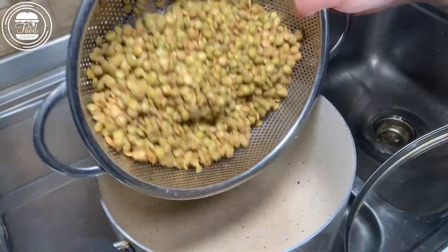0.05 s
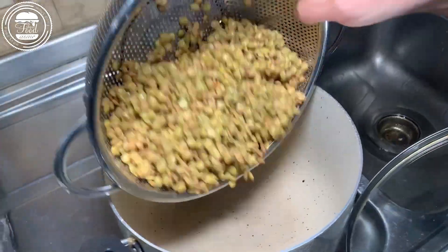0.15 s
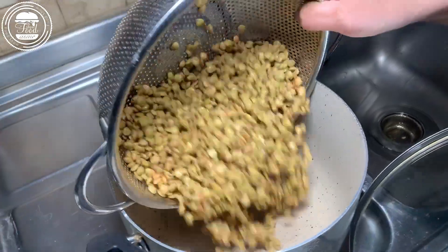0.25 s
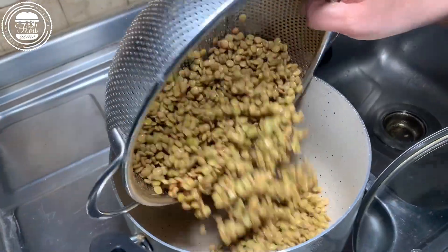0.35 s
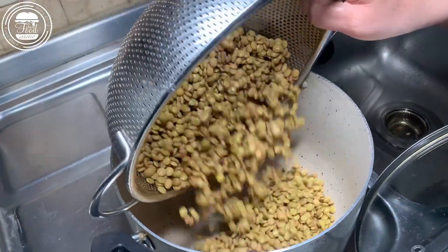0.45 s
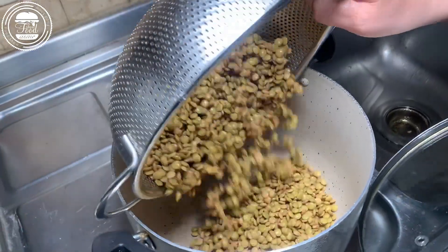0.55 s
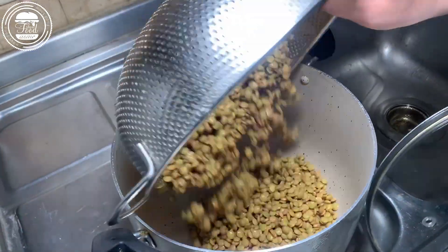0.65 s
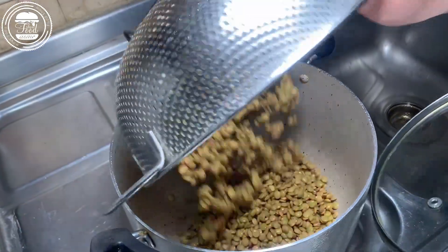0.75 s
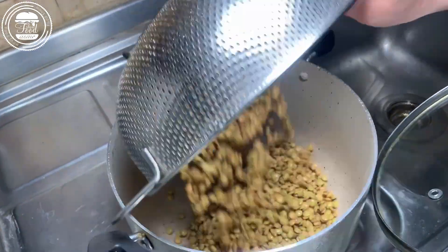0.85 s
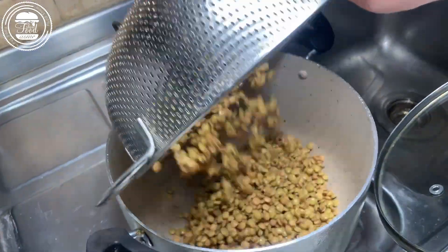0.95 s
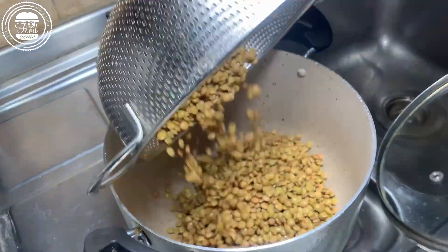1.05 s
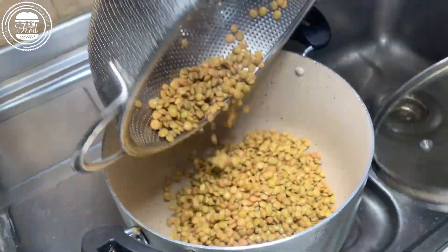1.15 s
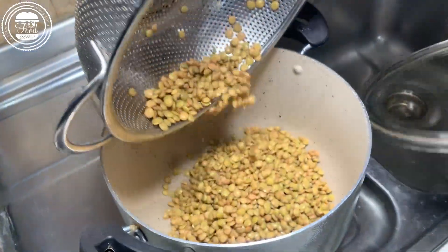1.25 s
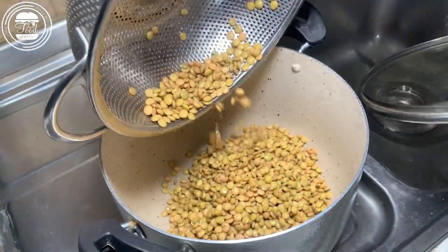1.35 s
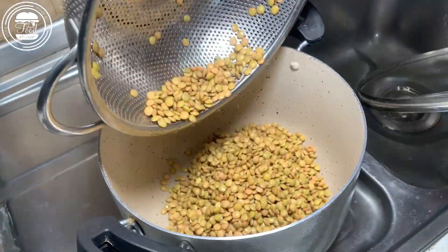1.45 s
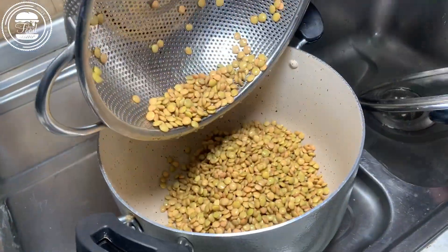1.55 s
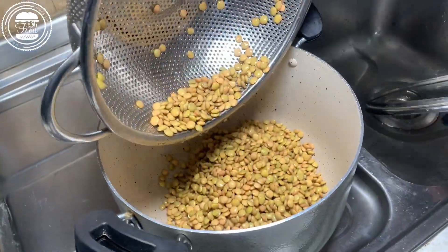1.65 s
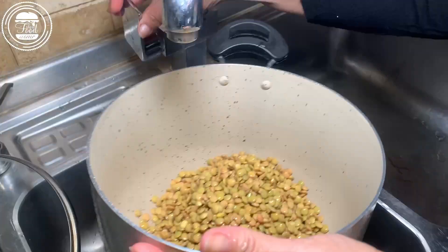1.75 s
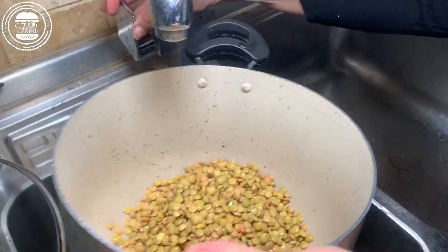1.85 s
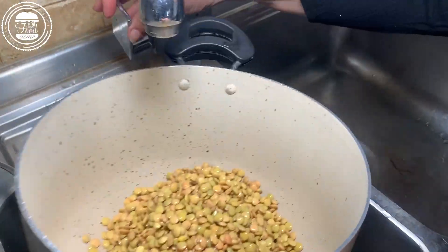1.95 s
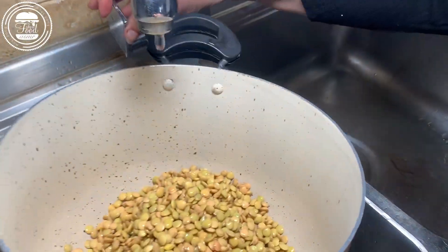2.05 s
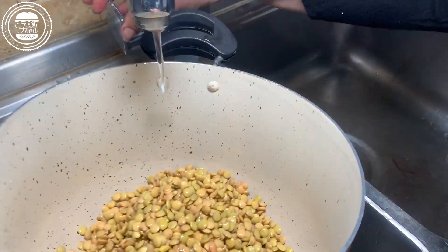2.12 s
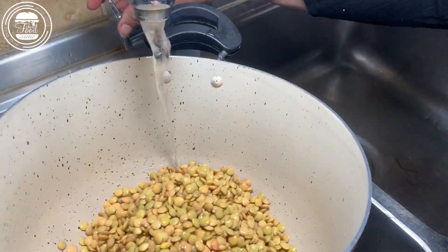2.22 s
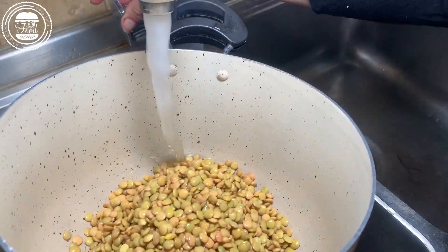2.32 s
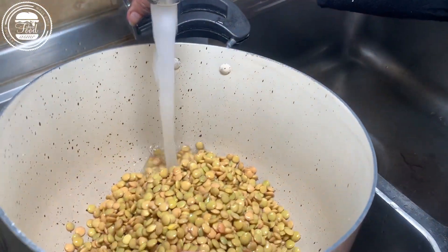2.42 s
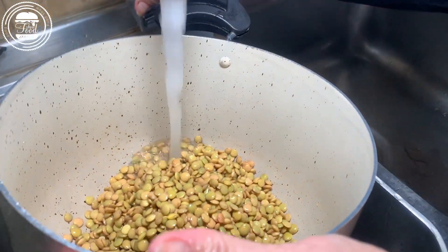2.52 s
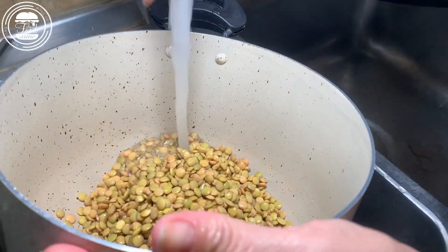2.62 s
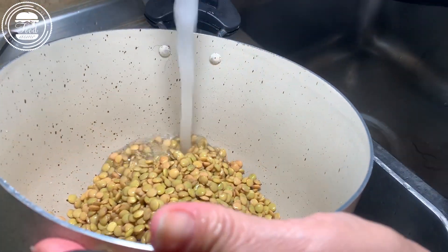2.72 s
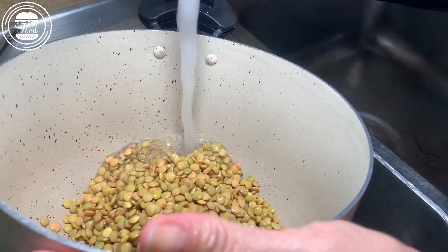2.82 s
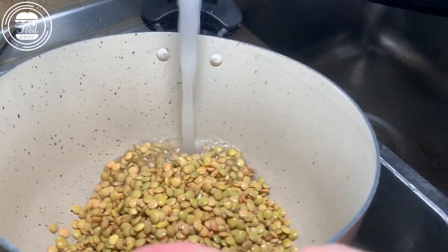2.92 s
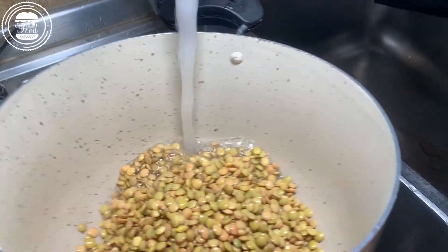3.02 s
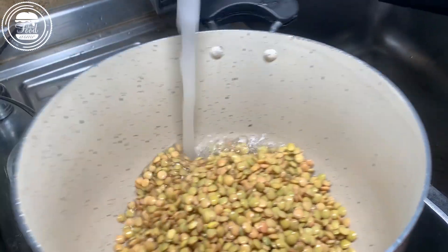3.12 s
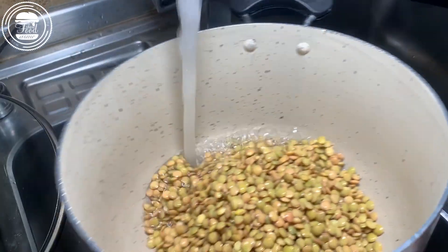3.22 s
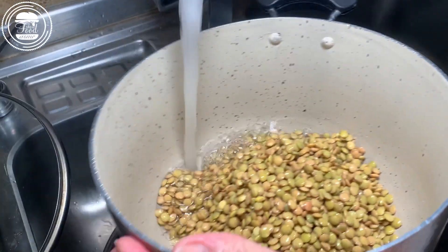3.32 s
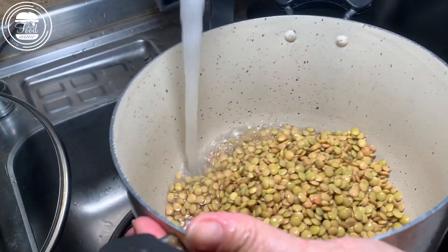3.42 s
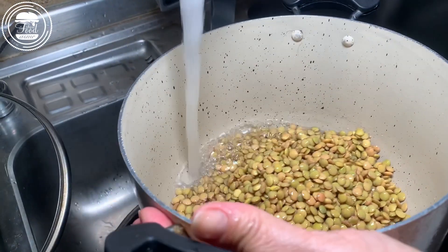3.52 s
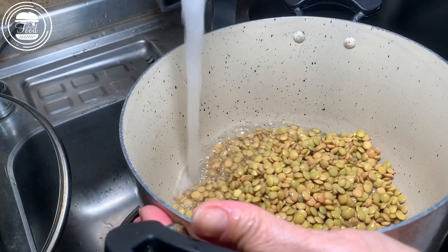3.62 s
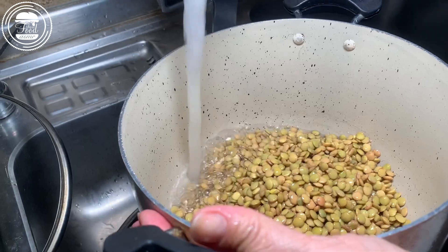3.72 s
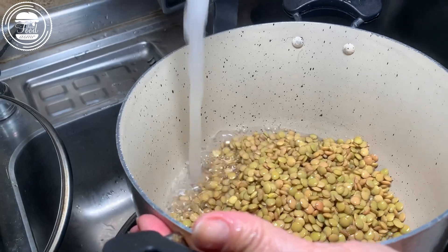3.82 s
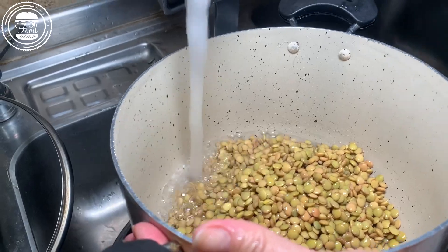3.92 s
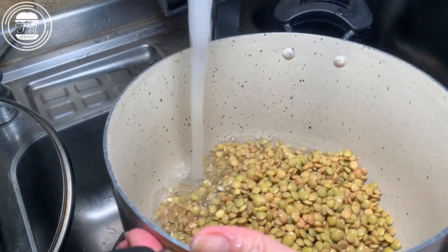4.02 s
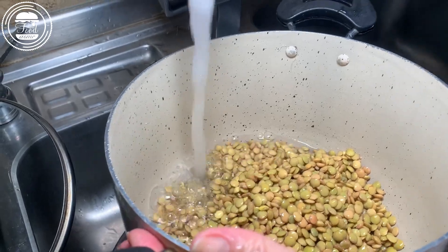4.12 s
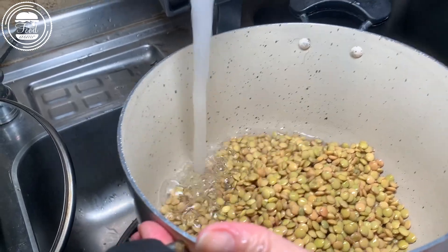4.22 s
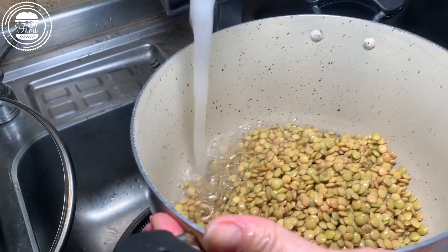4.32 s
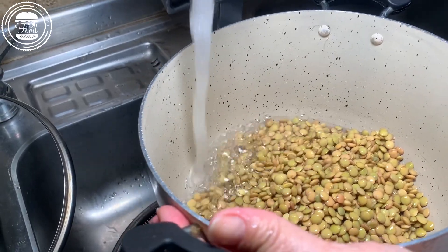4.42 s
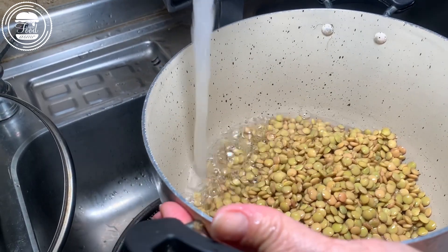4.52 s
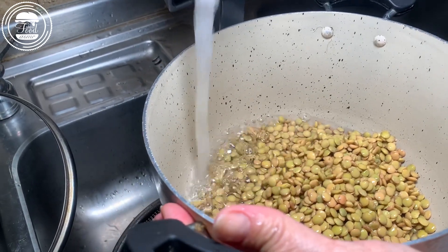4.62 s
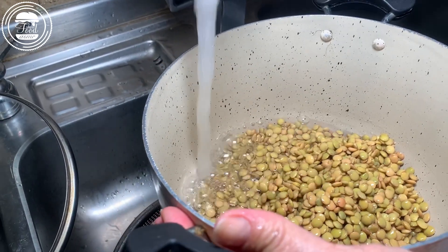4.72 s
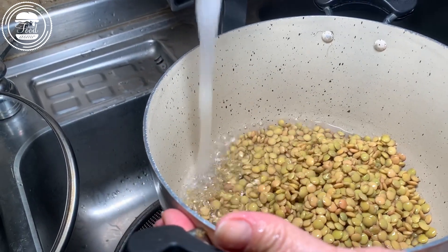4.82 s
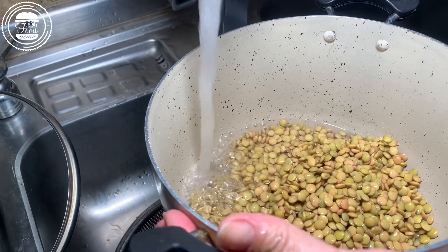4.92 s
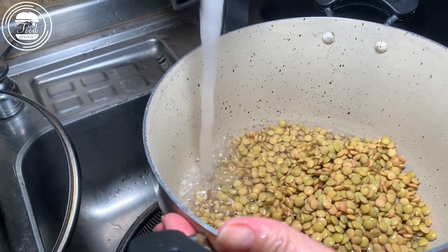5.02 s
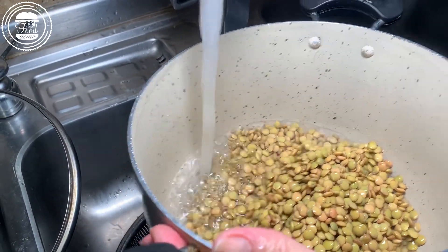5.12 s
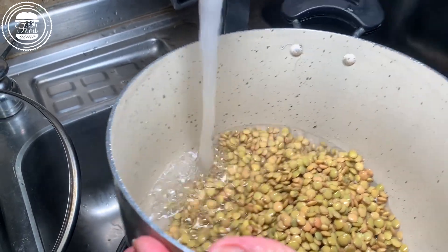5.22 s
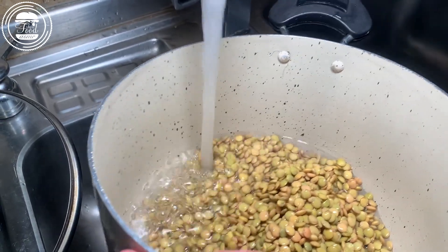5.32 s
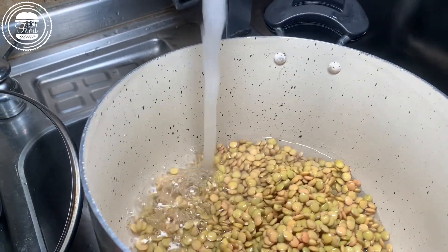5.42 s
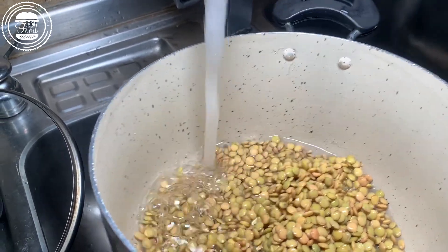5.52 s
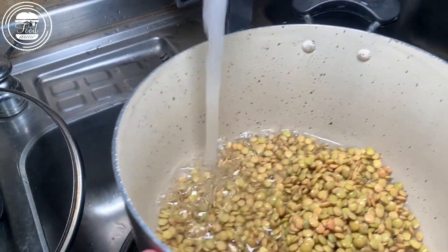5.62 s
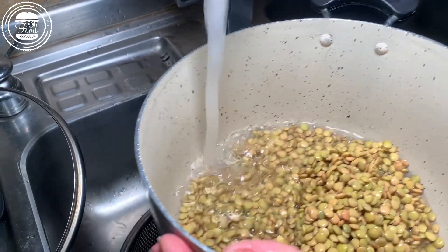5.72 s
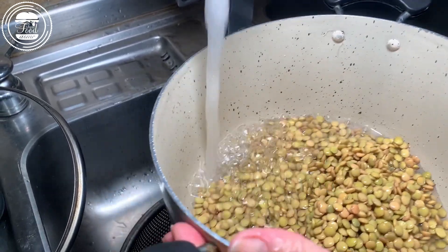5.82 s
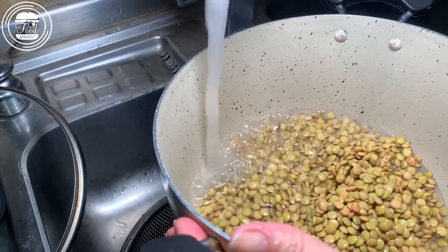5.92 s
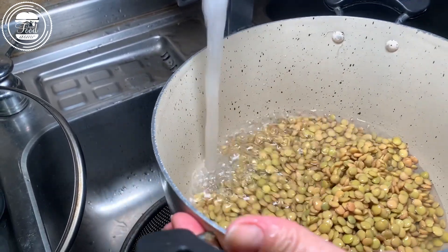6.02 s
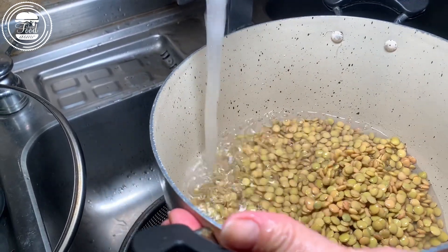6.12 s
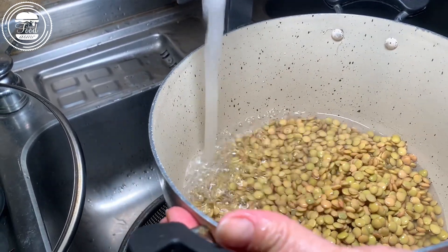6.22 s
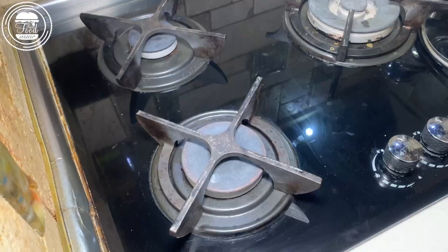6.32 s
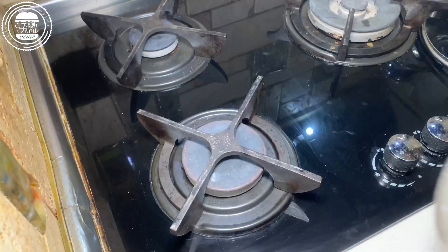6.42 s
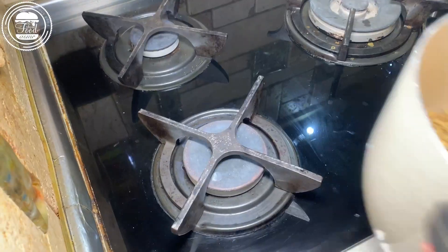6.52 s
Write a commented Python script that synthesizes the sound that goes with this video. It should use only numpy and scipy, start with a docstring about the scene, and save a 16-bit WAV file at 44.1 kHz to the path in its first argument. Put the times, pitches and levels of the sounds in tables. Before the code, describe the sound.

Wet lentils slide from a steel colander and rattle into a pot with two metallic knocks, then a tap hisses open and water spatters.

```python
"""Over a low, slow air rumble, wet lentils slide in a steel colander, which knocks twice on a cooking pot.
The lentils patter and drum into the pot: filtered noise impacts, short rings and decaying steel modes.
A tap opens with hiss and a thin whistle: moving noise bands and a phase-wobbled sine.
Its aerated jet fizzes, spatters and gurgles on the lentils, built from ring clouds and noise, then stops
abruptly. A small kitchen, heard close, adds a short decaying noise reverberation."""
import sys
import numpy as np
from scipy import signal
from scipy.fft import rfft, irfft, next_fast_len
from scipy.io import wavfile
from scipy.ndimage import map_coordinates

SR = 44100
rng = np.random.default_rng(int(sys.argv[2]) if len(sys.argv) > 2 else 0)


def dump(signal):
    """Clip the signal to [-1, 1] and save it as 16-bit WAV at the path in sys.argv[1]."""
    limited = np.clip(np.atleast_2d(signal).T, -1, 1)
    pcm = np.round(limited * 32767).astype(np.int16)
    wavfile.write(sys.argv[1], SR, pcm)


N = 289296
T = np.arange(N) / SR
T_HALF_S = T[:SR // 2]
TOP_HZ = 15850
# Table levels are relative: layer trims follow, and colour() normalizes each spectrum.


def amp(db):
    """Decibels to gain."""
    return 10 ** (np.asarray(db) / 20)


def unit(x):
    """Scale to rms 1."""
    return x / np.sqrt(np.mean(x ** 2) + 1e-20)


def along(points, hz):
    """Interpolate (frequency [Hz], value) points on a log frequency axis."""
    f, v = np.transpose(points)
    return np.interp(np.log(hz + 1), np.log(f + 1), v)


def ramp(start_s, length_s):
    """Linear gain from 0 to 1."""
    return np.clip((T - start_s) / length_s, 0, 1)


def swells(rows):
    """Power sum of (time [s], level [dB], rise [s], fall [s]) swells; rise and fall each span 20 dB."""
    power = 0
    for s, db, rise_s, fall_s in rows:
        drop_db = 20 * np.maximum((s - T) / rise_s, (T - s) / fall_s)
        power = power + amp(db - drop_db) ** 2
    return np.sqrt(power)


def fade(t60_s, swell_s):
    """Half a second of rise and exponential decay."""
    return amp(-60 * T_HALF_S / t60_s) * (1 - np.exp(-(T_HALF_S / swell_s) ** 2))


def wobble(knots_per_s):
    """Smooth random curve."""
    return map_coordinates(rng.standard_normal(4096), [T * knots_per_s], mode="wrap")


def noise():
    """White noise of rms 1."""
    return rng.standard_normal(N)


def short_noise():
    """Half a second of white noise."""
    return rng.standard_normal(SR // 2)


def tone(hz, climb_per_s=0):
    """Half a second of sine; a positive climb raises the pitch."""
    return np.sin(2 * np.pi * hz * T_HALF_S * (1 + climb_per_s * T_HALF_S))


def lowpass(x, hz):
    """Second-order low-pass."""
    return signal.sosfilt(signal.butter(2, hz, fs=SR, output="sos"), x)


def colour(x, spectrum, resonances=()):
    """Minimum-phase filter that keeps white-noise power: a spectrum lifted by ringing resonances."""
    size = 2 * next_fast_len(N // 2 + 8192)
    hz = np.fft.rfftfreq(size, 1 / SR)
    lift = 1
    for f, width_hz, db in resonances:
        lift = lift + (amp(2 * db) - 1) / (1 + (2 * (hz - f) / width_hz) ** 2)
    gain = unit(amp(along(spectrum, hz)) * np.sqrt(np.abs(lift)))
    cepstrum = irfft(np.log(np.maximum(gain, 1e-6)))
    # fold onto positive time: causal response
    cepstrum[1:size // 2] *= 2
    cepstrum[size // 2 + 1:] = 0
    return irfft(rfft(x, size) * np.exp(rfft(cepstrum)))[:N]


def narrow(hz, width_hz):
    """Noise band of rms 1 whose centre may move."""
    slow = lowpass(noise() + 1j * noise(), width_hz / 2)
    carrier = np.exp(2j * np.pi * np.cumsum(hz + 0 * T) / SR)
    return unit((slow * carrier).real)


def impacts(rate, spread_db):
    """Single-sample blows at random moments, signs and sizes, rate per second, rms 1."""
    hit = rng.random(N) < rate / SR
    size = amp(spread_db * np.clip(noise(), -2, 2))
    return unit(hit * np.sign(noise()) * size)


def add(track, s, sound):
    """Mix a sound into the track at time s."""
    part = track[max(round(s * SR), 0):][:len(sound)]
    part += sound[:len(part)]


def bursts(rows):
    """Decaying noise crack per (time [s], level [dB], t60 [s]) row."""
    out = np.zeros(N)
    for s, db, t60_s in rows:
        add(out, s, amp(db) * fade(t60_s, 1e-4) * short_noise())
    return out


def grains(low_hz, high_hz, cycles, spread_db, rise, count):
    """Cloud of tiny decaying rings, rms 1; with rise > 0 each climbs in pitch like a surfacing bubble."""
    when, pitch, size = rng.random((count, 3)).T[:, :, None]
    k = np.arange(400)
    turns = low_hz * (high_hz / low_hz) ** pitch * k / SR
    age = turns / cycles
    size_db = spread_db * np.minimum(-np.log(1 - size), 4)
    tilt_db = 20 * pitch * np.log10(high_hz / low_hz)
    ring = amp(size_db + tilt_db) * np.exp(-2 * age) * np.sin(2 * np.pi * turns * (1 + rise * age))
    return unit(np.bincount(((when * N).astype(int) + k).ravel(), ring.ravel(), N)[:N])


# slow air spectrum: (frequency [Hz], density [dB])
AIR_SPECTRUM = [(13, 20), (22, 1), (55, 5.5), (80, -7), (110, -8), (300, -48.5)]
# room tone spectrum: (frequency [Hz], density [dB])
ROOM_SPECTRUM = [(120, -19.5), (400, -4.5), (800, -11.5), (1400, -14.5), (4400, -22), (5300, -28),
                 (15800, -38)]


def air_and_room():
    """Slow air on the microphone as fluctuating low noise, plus room tone and a faint low drone."""
    rumble = amp(-45.5 + 1.2 * wobble(26)) * colour(noise(), AIR_SPECTRUM)
    room = amp(-64) * colour(noise(), ROOM_SPECTRUM)
    drone = amp(-71) * narrow(189, width_hz=22)
    return rumble + room + drone


# lentils sliding in the tilted colander: (peak time [s], level [dB], rise [s], fall [s])
SLIDES = [(.135, -45, .18, .11), (.45, -45, .2, .55), (1.12, -49, .7, .28), (1.465, -60, .15, .04)]
# lentils skipping on the steel: (time [s], level [dB])
SKIPS = [(.0705, -44), (1.221, -38), (1.477, -46)]
# sliding spectrum: (frequency [Hz], density [dB])
RUSTLE_SPECTRUM = [(700, -21.5), (1500, -2), (2600, 0.5), (4000, -3), (5000, -10), (6200, -7.5),
                   (7200, -13.5), (9500, -14.5), (12000, -27), (15800, -31)]


def sliding_lentils():
    """Lentils rub and skip over perforated steel: dense impacts, noise and short cracks."""
    sliding = swells(SLIDES) * (impacts(rate=1100, spread_db=4) + .3 * noise())
    skips = bursts([(s, db, 0.025) for s, db in SKIPS])
    return colour(amp(-2.5) * (sliding + skips), RUSTLE_SPECTRUM)


# colander on pot: (time [s], level [dB], swell [s], rattle t60 [s], rattle level [dB],
# high-mode level [dB], contact brightness [Hz])
KNOCKS = [(0.2184, -39, 0.001, 0.09, -6, -15, 9000), (0.238, -7, 0.0031, .05, -11.5, -22, 10000),
          (0.8572, -13.5, .004, 0.088, -1.5, -4, 12000), (.931, -34, .007, .14, -4, 0, 5000)]
# colander and pot modes: (frequency [Hz], level [dB], t60 before grip scaling [s])
STEEL_MODES = [(400, -6, .07), (450, -2, .065), (550, -8, .06), (945, 1.5, .09), (1040, -11, .06),
               (1879, -19, .11), (2298, -13, .15), (2406, -12, .12), (2632, -12.5, .32), (3266, -9, .12),
               (3655, -12, .1), (3743, -9, .09), (3833, -10, .16), (3946, -14, .12), (4503, -17, .19),
               (5862, -18, .08)]
# rim chatter spectrum: (frequency [Hz], density [dB])
RATTLE_SPECTRUM = [(80, -21), (300, -15), (449, -6), (747, -11), (952, -8), (1360, -19), (2450, -12),
                   (3010, -19), (3750, -9), (4950, -23), (6000, -20), (10000, -33), (15800, -44)]


def colander_knocks():
    """The rim chatters on the pot and both ring as decaying modes; each knock sets its high-mode level."""
    ring, chatter = np.zeros(N), np.zeros(N)
    for s, db, swell_s, t60_s, rattle_db, high_db, bright_hz in KNOCKS:
        grip = t60_s / 0.1  # a rim that stays pressed on damps rattle and ring alike
        for hz, mode_db, life_s in STEEL_MODES:
            high_share = np.clip(hz / 1500 - .27, 0, 1)
            level_db = db + mode_db + high_db * high_share + rng.normal(0, 1)
            mode = np.sin(2 * np.pi * (hz * T_HALF_S + rng.random()))
            add(ring, s, amp(level_db) * fade(life_s * grip, swell_s) * mode)
        contacts = unit(impacts(rate=2500, spread_db=2) + .5 * noise())[:len(T_HALF_S)]
        contacts = lowpass(contacts, min(bright_hz, TOP_HZ))
        add(chatter, s, amp(db + rattle_db) * fade(t60_s, swell_s) * contacts)
    return amp(7) * ring + amp(9) * colour(chatter, RATTLE_SPECTRUM)


# batches falling into the pot:
# (peak time [s], patter level [dB], drumming level [dB], rise [s], fall [s])
BATCHES = [(.294, -16, -16.5, .037, .14), (.5, -31, -35.5, .2, .29), (.718, -32, -33, .08, .05),
           (1.04, -44.5, -41, .7, .38)]
# lentils that hit hard, alone or stuck together: (time [s], level [dB], t60 [s])
TICKS = [(.331, -14, .02), (.4118, -2, .011), (.4325, -13, .014), (.4492, -15, .012), (.48, -17, .03),
         (.4918, -12, .028), (.504, -9, .018), (.529, -16, .025), (.6025, -21, .03), (.636, -25, .02),
         (.666, -18.5, .04), (.7145, -15.5, .025), (.724, -19, .025), (.7526, -21, .012), (.784, -17, .022),
         (1.055, -33, .03), (1.191, -38, .02), (1.361, -49, .04), (1.446, -46, .015)]
# patter spectrum: (frequency [Hz], density [dB])
PATTER_SPECTRUM = [(700, -25), (1250, -9), (1600, 0), (2200, -5), (2800, 1.5), (3250, -4.5), (4000, -2.5),
                   (4800, -17.5), (6200, -15.5), (7300, -26), (9500, -27.5), (12000, -37), (15000, -53)]
# pot wall resonances: (frequency [Hz], width [Hz], lift [dB])
WALL_MODES = [(1072, 20, 6), (1569, 16, 6), (1835, 16, 5.5), (2492, 12, 9), (2808, 20, 6), (3026, 14, 7),
              (3435, 16, 5), (3824, 14, 7), (3930, 14, 7)]


def lentils_on_wall():
    """Lentils strike the pot wall: one dense rush for the heap, dry ticks for the stragglers."""
    patter = swells([(s, db, rise_s, fall_s) for s, db, _, rise_s, fall_s in BATCHES])
    heap = np.clip(patter / amp(-23), 0, 1)
    rush = np.sqrt(heap) * amp(1.3 * wobble(130)) * impacts(rate=1700, spread_db=2.2)
    single = grains(low_hz=1400, high_hz=5340, cycles=7, spread_db=4, rise=0, count=5000)
    stragglers = amp(-9.5) * patter * np.sqrt(1 - heap) * single
    ringing = colour(patter * rush + amp(-7.5) * bursts(TICKS), PATTER_SPECTRUM, WALL_MODES)
    wall = ringing + colour(stragglers, PATTER_SPECTRUM)
    return lowpass(wall, 10200)  # wet skins soften each contact


# soft clumps landing: (time [s], level [dB], t60 [s])
CLUMPS = [(0.264, -24.5, 0.11), (0.683, -34.5, 0.2), (.885, -27, 0.2), (.933, -23, 0.16),
          (1.039, -46.5, 0.52), (1.449, -51, 0.17)]
# dull landing spectrum: (frequency [Hz], density [dB])
THUD_SPECTRUM = [(40, 2), (120, 0), (200, -1), (310, -5), (450, 2.5), (720, -9.5), (1000, -6.5),
                 (1600, -18), (3000, -46)]
# pot base spectrum: (frequency [Hz], density [dB])
BASE_SPECTRUM = [(120, -21), (190, -12.5), (260, -32), (400, -4), (500, -1), (730, -18.5), (900, -10),
                 (1050, -2.5), (1250, -25), (1800, -41), (15800, -56)]


def lentils_on_base():
    """Lentils drum on the bare base, then land dully as the growing pile covers it; wet clumps thud."""
    drumming = swells([(s, db, rise_s, fall_s) for s, _, db, rise_s, fall_s in BATCHES])
    bare = np.interp(T, [.4, 1], [1, 0])
    landing = amp(-3.5) * drumming * impacts(rate=900, spread_db=3.5)
    thuds = landing * np.sqrt(1 - bare)
    for s, db, t60_s in CLUMPS:
        add(thuds, s, amp(db) * fade(t60_s, 0.004) * short_noise())
    base = colour(landing * np.sqrt(bare), BASE_SPECTRUM, WALL_MODES)
    return base + colour(thuds, THUD_SPECTRUM)


# low thumps, a lentil clump landing or hands shifting the pot: (time [s], level [dB])
THUMPS = [(.58, -45), (.865, -36), (.94, -37), (1.79, -50), (1.87, -52), (2.06, -51), (2.47, -46),
          (3.22, -43), (4.56, -46), (5.07, -47), (6.012, -45.5), (6.25, -49)]
# thump spectrum: (frequency [Hz], density [dB])
THUMP_SPECTRUM = [(30, -6.5), (55, 10), (125, 3), (190, -17), (320, -37.5), (1500, -42), (5000, -70)]
# hand rubbing on the pot: (peak time [s], level [dB], rise [s], fall [s])
BRUSHES = [(1.82, -63, .05, .9)]
# rubbing spectrum: (frequency [Hz], density [dB])
BRUSH_SPECTRUM = [(700, -5), (1050, 1), (1900, -9), (4700, -10), (5400, -26), (12000, -36)]


def thumps_and_hand_rub():
    """Low thumps on the pot are dull noise bursts; a hand rubbing it is unsteady noise."""
    thumps = amp(3) * colour(bursts([(s, db, 0.22) for s, db in THUMPS]), THUMP_SPECTRUM)
    rubbing = swells(BRUSHES) * amp(2.5 * wobble(45)) * noise()
    return thumps + colour(rubbing, BRUSH_SPECTRUM)


# colander rim rubbing briefly: (time [s], level [dB])
RIM_RUBS = [(1.176, -44.5), (1.4, -53.5)]
RUB_HZ, RUB_RISE_S, RUB_FALL_S = 2750, .035, .045


def rim_rubs():
    """The rubbing rim gives a soft ring: swelling narrow-band noise."""
    level = swells([(s, db, RUB_RISE_S, RUB_FALL_S) for s, db in RIM_RUBS])
    return level * narrow(RUB_HZ, width_hz=550)


# tap swells: (peak time [s], level [dB], rise [s], fall [s])
VALVE_HISS = (2.19, -50.5, .3, .38)
AERATOR_SQUEAL = (2.06, -56, .09, .13)
PIPE_WHISTLE = (2.23, -48, .15, .62)
# aerator bands: (frequency [Hz], width [Hz], level [dB])
AERATOR_BANDS = [(11900, 70, -6), (12750, 160, -6.5), (13020, 100, -4), (14600, 110, -5)]
# weaker spout tones: (frequency [Hz], level [dB])
PIPE_SIDE_TONES = [(3010, -16), (4060, -16), (6100, -14)]
# first water through the mesh: (frequency [Hz], density [dB])
SPUTTER_SPECTRUM = [(1000, -4.5), (3000, 0), (5500, -1), (8500, -5.5), (11000, -17), (15000, -17.5)]
PIPE_HZ = 3665
CRACK_S, CRACK_RISE_S = 1.97, .06  # the valve cracks open
VALVE_START_HZ, VALVE_END_HZ, VALVE_MID_S, VALVE_GLIDE_S = 7550, 5870, 2.13, .09


def tap():
    """The valve hisses as it cracks open, falling in pitch while the spout fills and whistles."""
    opening = ramp(CRACK_S, CRACK_RISE_S)
    filled = (1 + np.tanh((T - VALVE_MID_S) / VALVE_GLIDE_S)) / 2
    throat_hz = VALVE_START_HZ + (VALVE_END_HZ - VALVE_START_HZ) * filled
    throat = amp(-4 + 2 * wobble(80)) * narrow(throat_hz, width_hz=740)
    sputter = amp(-4 + 2 * wobble(60)) * colour(impacts(rate=2500, spread_db=4), SPUTTER_SPECTRUM)
    hiss = swells([VALVE_HISS]) * (throat + sputter)
    pipe = amp(2.5 * wobble(70)) * np.sin(2 * np.pi * PIPE_HZ * T + 1.5 * wobble(45))
    pipe += sum(amp(db) * narrow(hz, width_hz=60) for hz, db in PIPE_SIDE_TONES)
    whistle = amp(4) * swells([PIPE_WHISTLE]) * pipe
    aerator = sum(amp(db) * narrow(hz, width_hz) for hz, width_hz, db in AERATOR_BANDS)
    aerator = unit(aerator + narrow(11500, width_hz=6000))
    squeal = amp(0.5) * swells([AERATOR_SQUEAL]) * aerator
    return opening * (hiss + whistle + squeal)


ARRIVAL_S, ARRIVAL_RISE_S = 2.15, .09  # first water reaches the lentils
FULL_FLOW_S, OPENING_DB_PER_S = 2.42, 38


def flow():
    """Gain of the stream reaching the pot, building to full strength."""
    opening_db = OPENING_DB_PER_S * np.minimum(T - FULL_FLOW_S, 0)
    return ramp(ARRIVAL_S, ARRIVAL_RISE_S) * amp(opening_db)


# jet churning as the pot moves under it: (time [s], level [dB])
JET_CHURN = [(2.4, -37.4), (3.12, -38.7), (3.4, -32.0), (3.85, -33.9), (4.05, -39.0), (4.6, -36.9),
             (5.3, -38.9), (5.9, -38.2), (6.3, -40.6)]
CALM_DB = -38.5  # jet on the middle of the heap


def churn():
    """Churning in dB relative to a calm jet."""
    return np.interp(T, *np.transpose(JET_CHURN)) - CALM_DB


# extra bubbling in shallow water by the wall: (peak time [s], level [dB], rise [s], fall [s])
SHALLOWS = (4.6, -43.5, 2.4, 2.0)
# bubbling spectrum: (frequency [Hz], density [dB])
BUBBLING_SPECTRUM = [(300, -37.5), (620, -4.5), (850, -8), (1100, 0.5), (1400, -3.5), (1700, -1.5),
                     (2100, 1), (2600, -5.5), (3500, -4), (6000, -41)]
# air resonances in the open pot: (frequency [Hz], width [Hz], lift [dB])
CAVITY_MODES = [(1000, 70, 3), (1210, 25, 4), (1608, 54, 7.5), (2080, 130, 4), (3430, 220, 2.5)]
# calm-jet level, dB gained per dB of churning
BUBBLING_DB, BUBBLING_GROWS = -46.7, .1
BLIPS_DB, BLIPS_GROW = -49, .9
SURGE_BUBBLING_DB = -5.5


def bubbling_pool(stream, churn_db, surge):
    """The jet and its surges stir rings of climbing pitch; sparser, higher-pitched bubbles blip on top."""
    stirred = np.hypot(amp(BUBBLING_DB + BUBBLING_GROWS * churn_db), swells([SHALLOWS]))
    bubbling = np.hypot(stream * stirred, amp(SURGE_BUBBLING_DB) * surge)
    froth = grains(low_hz=811, high_hz=3988, cycles=12.7, spread_db=2.5, rise=0.014, count=6500)
    froth = froth + .9 * noise()
    sparse = grains(low_hz=1500, high_hz=4300, cycles=13, spread_db=2.2, rise=0.03, count=1100)
    blips = stream * amp(BLIPS_DB + BLIPS_GROW * churn_db) * sparse
    return colour(amp(-6.4) * bubbling * froth, BUBBLING_SPECTRUM, CAVITY_MODES) + blips


# spatter spectrum: (frequency [Hz], density [dB])
SPATTER_SPECTRUM = [(1200, -33), (2100, -4.5), (2700, -2.5), (3500, 1), (4200, -2), (4900, -11), (6200, -7),
                    (7000, -20), (9500, -18), (15000, -29)]
SPATTER_DB, SPATTER_GROWS = -42.6, .9  # calm-jet level, dB gained per dB of churning


def spatter_level(stream, churn_db, surge):
    """Spatter gain from steady churning and surges."""
    return np.hypot(stream * amp(SPATTER_DB + SPATTER_GROWS * churn_db), surge)


def droplet_gusts(level):
    """The harder it spatters, the more unevenly the drops fly."""
    unrest = np.clip(level / amp(-41.5), 0, 1)
    return amp(unrest * (1.14 * wobble(45) + 1.8 * wobble(160)))


def spatter(level, gusts):
    """Gusts of drops strike as random impacts, noise and plinking rings, coloured by the pot's air."""
    plinks = grains(low_hz=2200, high_hz=6420, cycles=29, spread_db=2.5, rise=0.05, count=1800)
    drops = gusts * (impacts(rate=4500, spread_db=4.0) + .55 * noise() + 0.36 * plinks)
    return colour(amp(-3.6) * level * drops, SPATTER_SPECTRUM, CAVITY_MODES)


# fine spray spectrum: (frequency [Hz], density [dB])
SPRAY_SPECTRUM = [(3000, -7.5), (5500, -4), (6300, -0.5), (7000, -2.5), (9000, -3), (11000, -9),
                  (13000, -13.5), (15800, -15.5)]
SPRAY_DB, SPRAY_GROWS = -50.5, .75  # calm-jet level, dB gained per dB of churning


def fine_spray(stream, churn_db, gusts):
    """Aerated spray fizzes as high, tiny rings over noise."""
    level = stream * amp(SPRAY_DB + SPRAY_GROWS * churn_db)
    fizz = grains(low_hz=3940, high_hz=14260, cycles=14, spread_db=-0.5, rise=.02, count=9000)
    fizz = fizz + 1.56 * noise()
    return colour(amp(-4.0) * level * fizz * np.sqrt(gusts), SPRAY_SPECTRUM)


# drops flung on the wall: (time [s], level [dB], starting bubble pitch [Hz])
SPLATS = [(2.2347, -23, 3670), (3.2041, -23, 2630), (3.312, -17, 2900), (3.3185, -17, 3300),
          (3.33, -17, 3540), (3.379, -21, 3480), (3.4621, -20, 2680), (3.5535, -18, 2290),
          (3.6606, -20, 2010), (3.6934, -21, 3810), (3.8951, -21, 1600), (3.9819, -21, 3430),
          (3.9934, -21, 3470), (4.3586, -21, 2490), (4.4222, -19, 2690), (4.5302, -20, 3400),
          (4.7485, -19, 3080), (4.7632, -16.5, 3580), (4.8588, -21, 3560), (5.2404, -23, 3500),
          (5.5931, -23, 3150), (5.6559, -21, 3100)]
SPLAT_RING_DB, SPLAT_RING_S, SPLAT_CLIMB_PER_S = -4, .016, 4


def splashes():
    """Each flung drop cracks, rings a trapped bubble of climbing pitch and scatters a brief shower."""
    rings = np.zeros(N)
    for s, db, hz in SPLATS:
        bubble = fade(SPLAT_RING_S, 0.0004) * tone(hz, SPLAT_CLIMB_PER_S)
        add(rings, s, amp(db + SPLAT_RING_DB) * bubble)
    cracks = amp(-9) * bursts([(s, db, .008) for s, db, _ in SPLATS])
    shower = amp(-17) * bursts([(s, db, .06) for s, db, _ in SPLATS])
    shower *= impacts(rate=2000, spread_db=2)
    return rings + colour(cracks + shower, SPATTER_SPECTRUM, CAVITY_MODES)


# jet digging a pocket by the wall: (time [s], level [dB], centre frequency [Hz])
POCKET = [(3.251, -42, 3200), (3.348, -39.5, 3278), (3.57, -43, 2600), (3.751, -42, 1950), (3.9, -40, 1650),
          (4.0, -62, 1395)]
POCKET_SPRAY_HZ, POCKET_SPRAY_DB = 6150, -7.5


def wall_pocket(gusts):
    """The jet churns in a pocket as a moving noise band and throws out bright spray."""
    s, db, hz = np.transpose(POCKET)
    away_db = 600 * np.abs(T - np.clip(T, s[0], s[-1]))  # fast fade outside the table
    level = amp(np.interp(T, s, db) - away_db)
    churning = narrow(np.interp(T, s, hz), width_hz=780)
    spray = amp(POCKET_SPRAY_DB) * narrow(POCKET_SPRAY_HZ, width_hz=1100)
    return level * gusts * (churning + spray)


# jet catching the heap and spattering harder: (time [s], level [dB])
SURGES = [(2.372, -38), (3.99, -42), (4.37, -37), (4.428, -33.5), (4.68, -38), (4.76, -35.5), (4.87, -33.5),
          (5.16, -40), (5.94, -40)]
SURGE_RISE_S, SURGE_FALL_S = .028, .065


def water():
    """The jet breaks into bubbles, gusts of droplets and fine spray in the hollow pot."""
    stream, churn_db = flow(), churn()
    surge = swells([(s, db, SURGE_RISE_S, SURGE_FALL_S) for s, db in SURGES])
    level = spatter_level(stream, churn_db, surge)
    gusts = droplet_gusts(level)
    pool = bubbling_pool(stream, churn_db, surge)
    drops = spatter(level, gusts) + fine_spray(stream, churn_db, gusts)
    return pool + drops + splashes() + wall_pocket(gusts)


# big bubbles: (time [s], level [dB], starting pitch [Hz])
GLUGS = [(3.663, -33.5, 486), (4.137, -36, 466), (4.217, -27.5, 510), (4.824, -30, 468), (4.952, -37, 536),
         (5.501, -38, 437)]
# lowest air resonance of the pot: (frequency [Hz], density [dB])
HOLLOW_SPECTRUM = [(200, -37.5), (300, -24), (380, -7.5), (425, 0.5), (470, 3.5), (540, -1.5), (600, -11.5),
                   (780, -11.5), (1100, -27.5)]
GURGLE_DB, POOL_FILL_S = -53.3, 1.0  # before trim; grows as a pool gathers


def gurgle():
    """Trapped air pulses under the jet and booms in the pot; big bubbles ring with climbing pitch."""
    level = amp(GURGLE_DB) * ramp(ARRIVAL_S, POOL_FILL_S)
    pulses = impacts(rate=240, spread_db=5.5) + .5 * noise()
    out = colour(amp(1.5) * level * pulses, HOLLOW_SPECTRUM)
    for s, db, hz in GLUGS:
        add(out, s, amp(db + 7) * fade(0.036, 0.0029) * tone(hz, climb_per_s=0.27))
    return out


# reverberation: (frequency [Hz], t60 [s])
KITCHEN_DECAY = [(200, .5), (1000, .36), (4000, .34), (12000, .25)]


def kitchen(x):
    """The tiled room answers with noise after 5 ms, decaying at a rate set by frequency."""
    hz, t, z = signal.stft(short_noise(), SR, nperseg=256)
    decay = amp(-60 * t / along(KITCHEN_DECAY, hz)[:, None])
    tail = signal.istft(z * decay, SR, nperseg=256)[1]
    response = np.r_[np.zeros(SR // 200), tail / np.linalg.norm(tail)]
    return signal.fftconvolve(x, response)[:N]


STOP_S = 6.324


def scene():
    """First the lentils, then the water; the water and its reverberation stop abruptly."""
    tipping = sliding_lentils() + colander_knocks() + lentils_on_wall() + lentils_on_base() + rim_rubs()
    tipping = tipping + amp(-10) * kitchen(tipping)
    filling = tap() + water() + gurgle()
    filling = filling + amp(-9) * kitchen(filling)
    running = np.clip((STOP_S - T) * 1000, 0, 1)  # 1 ms closing ramp
    return (air_and_room() + tipping + thumps_and_hand_rub() + running * filling)[None]


def record(dry):
    """Clip to full scale, then remove everything from TOP_HZ up."""
    size = next_fast_len(N + 8192)
    passband = np.fft.rfftfreq(size, 1 / SR) < TOP_HZ
    return irfft(rfft(np.clip(dry, -1, 1), size) * passband, size)[:, :N]


dry = scene()
out = record(dry)
dump(out)
```